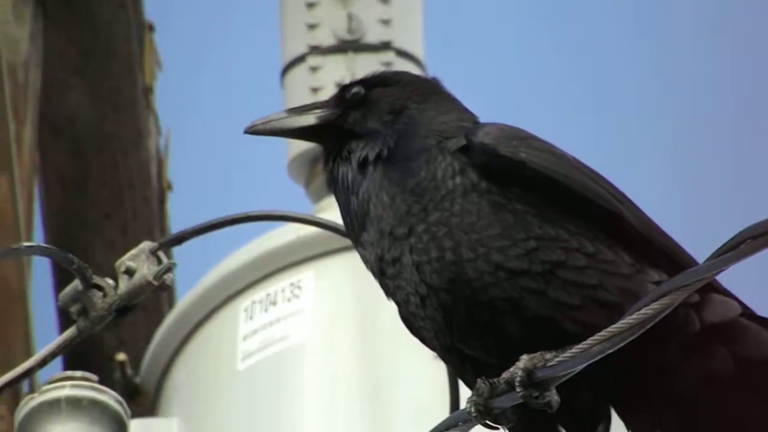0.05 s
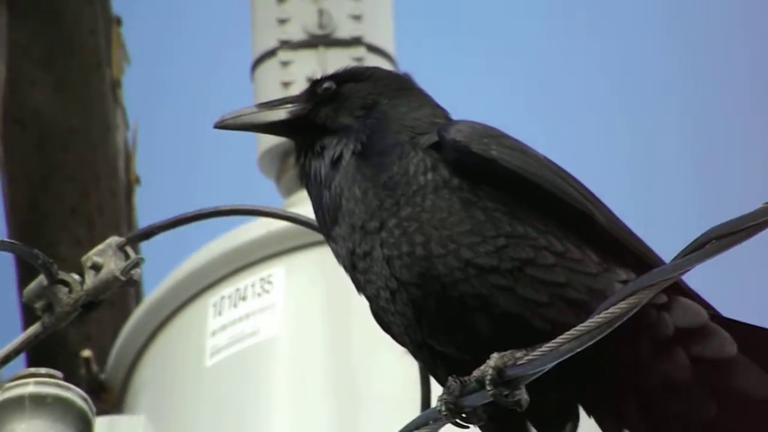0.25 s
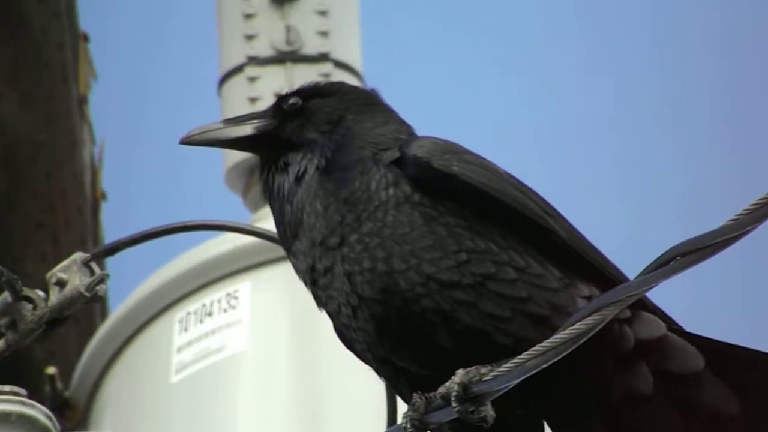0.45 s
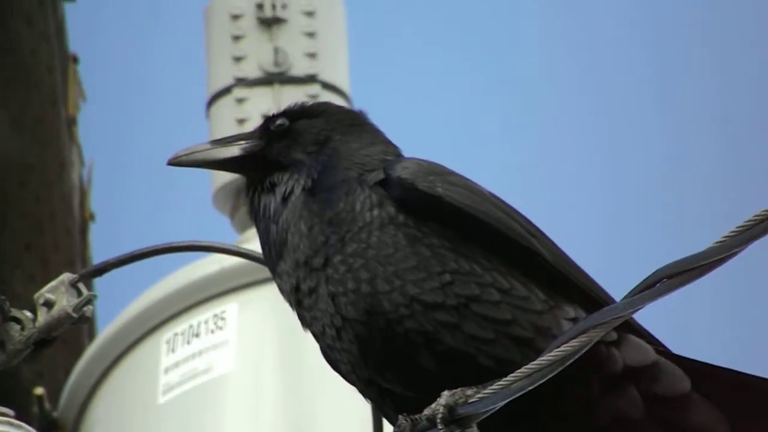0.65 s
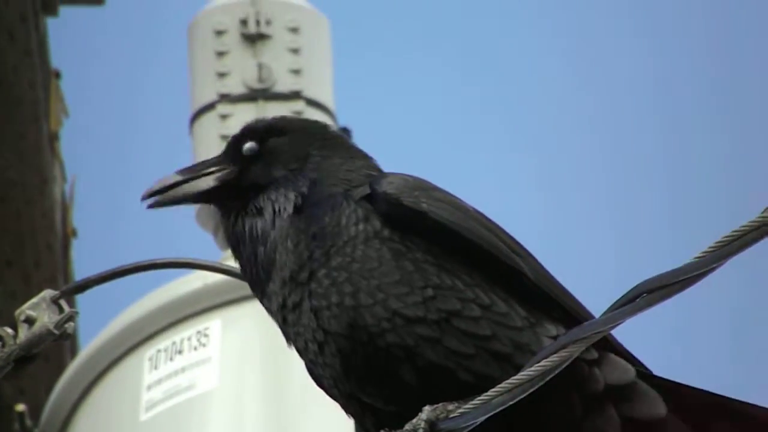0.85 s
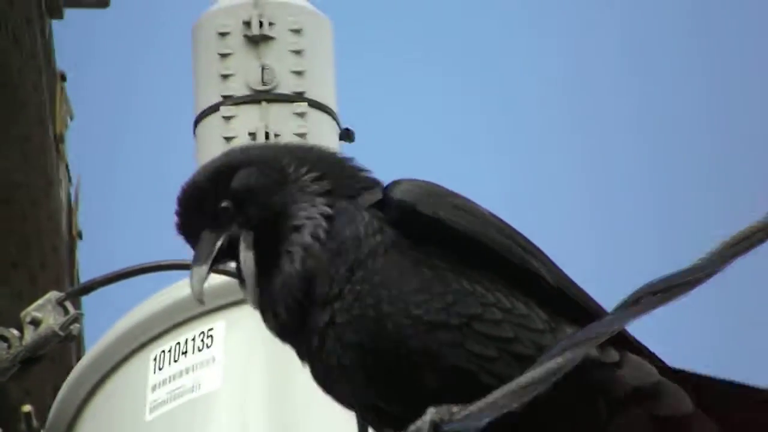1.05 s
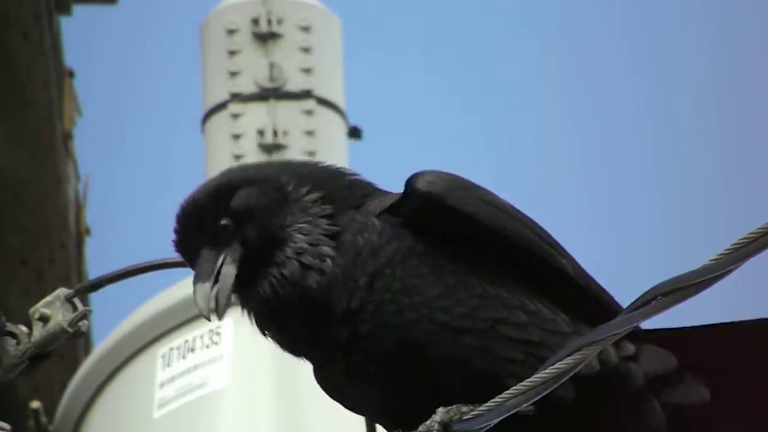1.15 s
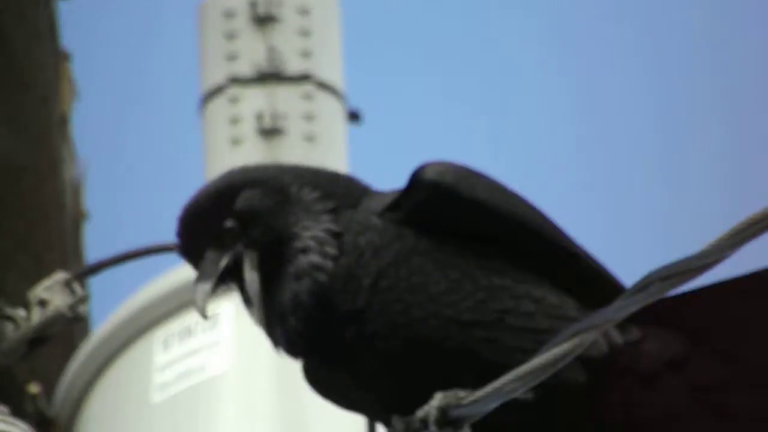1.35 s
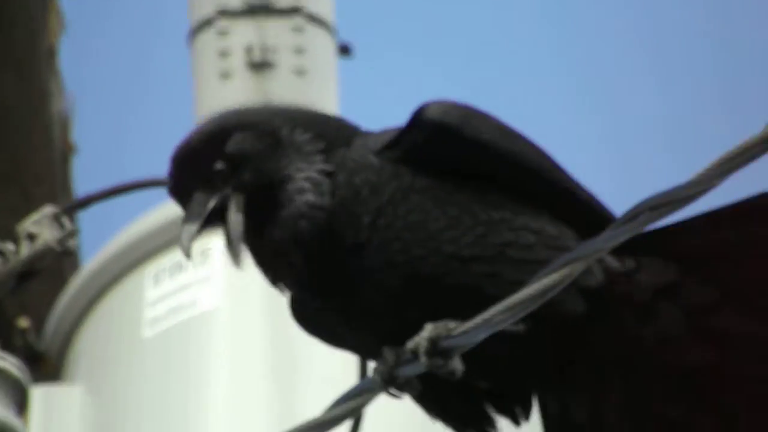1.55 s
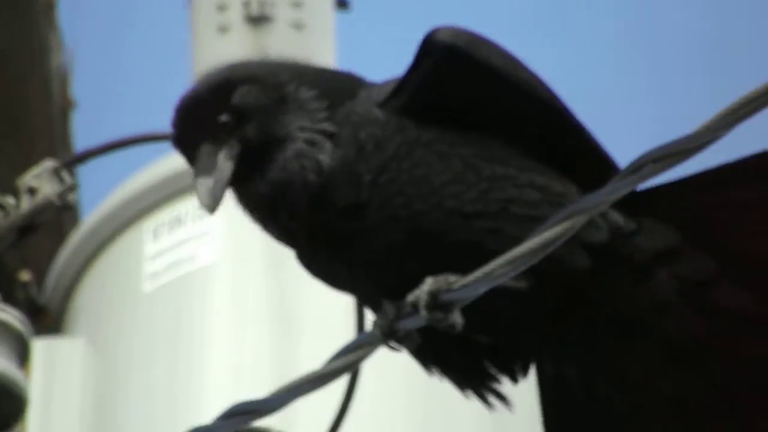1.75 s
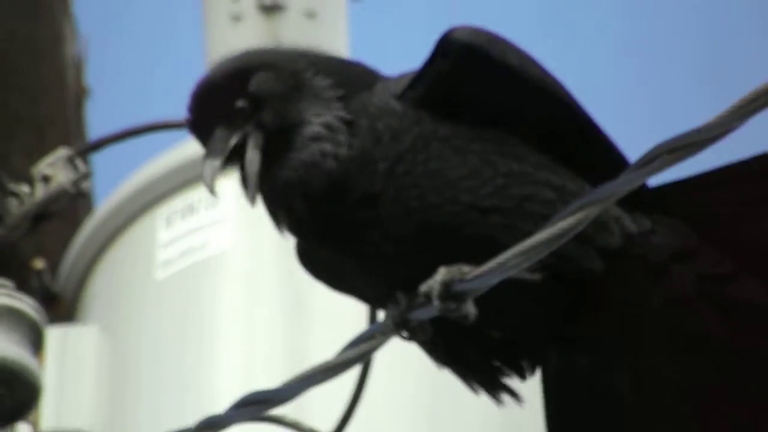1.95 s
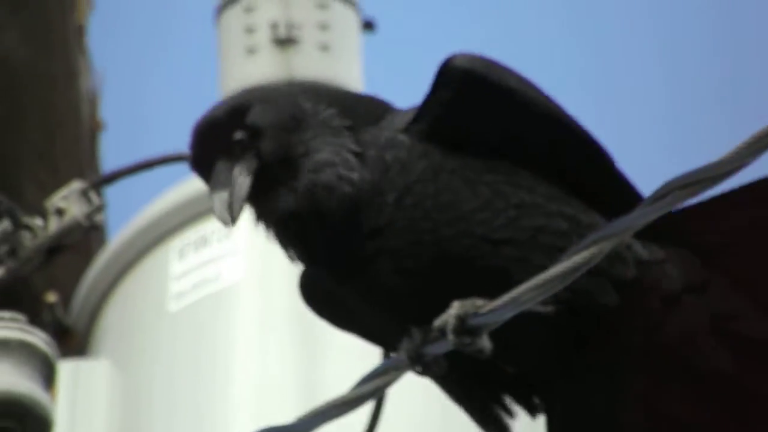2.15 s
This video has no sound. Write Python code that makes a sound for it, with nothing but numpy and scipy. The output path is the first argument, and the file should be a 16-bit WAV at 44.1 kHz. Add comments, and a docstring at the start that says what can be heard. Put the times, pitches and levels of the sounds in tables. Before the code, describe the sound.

A raven makes six hollow, evenly spaced knocking calls and a softer, lower clunk, with a slight outdoor echo. Before the calls, a brief gust flutters and pops on the microphone. A steady hiss lies underneath.

```python
"""A gust flutters and pops on the microphone, over outdoor hiss, a low hum and a faint camera whine.
As it dies down, a raven on a wire beside a pole transformer gives six hollow, evenly spaced knocks
and a softer, lower clunk. Each knock is a few cycles of throat resonance that ring on in the open bill;
the pole and nearby walls throw it back. A thin far whistle slowly swells behind it all."""
import sys
import numpy as np
from scipy import signal
from scipy.fft import rfft, irfft, next_fast_len
from scipy.io import wavfile
from scipy.ndimage import map_coordinates

SR = 44100
rng = np.random.default_rng(int(sys.argv[2]) if len(sys.argv) > 2 else 0)


def waveform_to_disk(signal):
    """Save audio, clipped to [-1, 1], as 16-bit WAV at the path in sys.argv[1]."""
    frames = np.transpose(np.atleast_2d(signal))
    scaled = np.clip(frames, -1, 1) * 32767
    samples = np.round(scaled).astype(np.int16)
    wavfile.write(sys.argv[1], SR, samples)


N = 97020  # 2.2 s


def amp(db):
    """Decibels to gain."""
    return 10 ** (np.asarray(db) / 20)


def clock():
    """Sample times in seconds."""
    return np.arange(N) / SR


def log_interp(points, hz):
    """Interpolate (frequency, value) points on a log frequency axis."""
    point_hz, values = np.transpose(points)
    return np.interp(np.log(hz + 1), np.log(point_hz + 1), values)


def filtered(x, response):
    """Apply a frequency response by zero-padded FFT."""
    size = next_fast_len(N + SR // 2)
    hz = np.fft.rfftfreq(size, 1 / SR)
    return irfft(rfft(x, size) * response(hz), size)[..., :N]


def noise(spectrum, flutter=1):
    """Coloured noise of rms 1; flutter modulates it ahead of the filter."""
    coloured = filtered(flutter * rng.standard_normal(N), lambda hz: amp(log_interp(spectrum, hz)))
    return coloured / np.sqrt(np.mean(coloured ** 2) + 1e-20)


# (frequency [Hz], relative density [dB])
HISS_SPECTRUM = [(20, -19), (32, -6), (50, -22), (100, -9), (200, -7), (380, -6), (560, 0.5), (900, 0),
                 (1400, -3), (1800, -4.5), (2350, -3), (2900, -8), (5900, -11.5), (8000, -10.5),
                 (9600, -15), (11000, -22), (14000, -25.5), (15500, -31)]
# (frequency [Hz], left-right correlation [ratio])
HISS_CORRELATION = [(900, 1), (2200, .998), (5000, 0.96), (9000, 0.94), (13000, 0.87)]


def outdoor_hiss(mid_rms_db=-54):
    """Steady hiss, wider in the treble."""
    def mid_side_response(hz):
        side_gain = np.tan(np.arccos(log_interp(HISS_CORRELATION, hz)) / 2)
        return amp(log_interp(HISS_SPECTRUM, hz)) * [np.ones_like(hz), side_gain]

    mid, side = filtered(rng.standard_normal((2, N)), mid_side_response)
    return amp(mid_rms_db) * np.array([mid + side, mid - side]) / mid.std()


# (frequency [Hz], rms level [dB])
HUM_TONES = [(64.6, -68.5), (129.5, -77)]
# (frequency [Hz], rms level [dB])
CAMERA_WHINE_TONES = [(9777, -73.5), (11714, -81)]


def hum_and_whine():
    """A low hum and the camera's thin whine: steady sines at random phases."""
    return sum(amp(db) * np.sqrt(2) * np.sin(2 * np.pi * (hz * clock() + rng.random()))
               for hz, db in HUM_TONES + CAMERA_WHINE_TONES)


# (start [s], end [s], pitch [Hz], top rms level [dB])
FAR_WHISTLE = (0.2, 4.3, 1432, -66)


def far_whistle():
    """A thin far tone, still swelling when the scene ends."""
    start_s, end_s, hz, db = FAR_WHISTLE
    progress = np.clip((clock() - start_s) / (end_s - start_s), 0, 1)
    swell = np.sqrt(2 * np.sin(np.pi * progress))
    return amp(db) * swell * np.sin(2 * np.pi * hz * clock())


def pressure_swing(cycles, half_width_cycles):
    """One eddy passing the microphone: a sine under a Gaussian envelope."""
    return np.exp(-.5 * (cycles / half_width_cycles) ** 2) * np.sin(2 * np.pi * cycles)


# (time [s], eddy strength [dB])
GUST_STRENGTH = [(0, -77), (.165, -72), (.21, -47), (.25, -54), (.32, -60), (.37, -50), (.41, -56),
                 (.47, -40), (.51, -32.5), (.542, -44.5), (.585, -37.5), (.64, -43), (.70, -52),
                 (.74, -40.5), (.83, -45), (.88, -50.5), (.95, -70), (1.05, -61.5), (1.10, -70),
                 (1.38, -72)]


def eddies(count=300, boost_db=4, scatter_db=3, crest_hz=638, oct_per_db=.05, scatter_oct=.2):
    """A stream of small random pops, louder and higher when the gust is strong."""
    knot_s, knot_db = np.transpose(GUST_STRENGTH)
    jitter, detune, polarity, spread = rng.standard_normal((count, 4)).T
    centre_s = knot_s[-1] * (np.arange(count) + .5 * jitter) / count
    gust_db = np.interp(centre_s, knot_s, knot_db)
    hz = crest_hz * 2 ** (oct_per_db * (gust_db - knot_db.max()) + scatter_oct * detune)
    gain = np.sign(polarity) * amp(gust_db + boost_db + scatter_db * np.clip(spread, -2, 2))
    offsets = np.arange(-SR // 100, SR // 100)
    swings = gain[:, None] * pressure_swing(hz[:, None] * offsets / SR, half_width_cycles=.42)
    samples = np.abs((centre_s * SR).astype(int)[:, None] + offsets)
    return np.bincount(samples.ravel(), swings.ravel(), N)[:N]  # overlap-add


# (time [s], envelope peak [dB], pitch [Hz], half width [cycles])
GUST_POPS = [(0.2203, -27.5, 510, 0.38), (0.2287, -32, 430, .29), (.273, -24, 493, 0.3),
             (.365, -18, 476, 0.26), (.388, -21.5, 507, 0.37), (0.4297, -28, 400, 0.38),
             (.4541, -27, 450, 0.31), (0.4708, -22, 484, .28), (0.4954, -21.5, 544, 0.27),
             (.5021, -15, 480, 0.18), (.5076, -19, 570, 0.9), (.5185, -23.5, 652, 1.4),
             (.5262, -27, 554, 0.72), (.535, -33, 474, 0.78), (0.5532, -28, 420, 0.43),
             (0.564, -20, 444, 0.41), (0.574, -22.5, 430, 0.24), (0.577, -31, 630, 0.3),
             (0.6068, -23, 400, 0.21), (.631, -31, 420, .5), (.6753, -25, 376, 0.33),
             (.742, -24, 395, 0.91), (0.7498, -21, 400, .25), (0.7899, -22, 440, 0.53),
             (.808, -15.5, 435, 0.25), (0.8173, -25, 530, 0.43), (0.8287, -28, 420, 0.2),
             (.862, -33, 467, 0.39), (.879, -34, 440, 0.38), (0.91, -33.5, 420, 0.3), (.938, -36, 151, .3),
             (1.112, -45.5, 148, 0.43)]


def wind_pops():
    """The strongest eddies hit the microphone as single pops, sharp or round."""
    return sum(amp(db) * pressure_swing(np.clip((clock() - centre_s) * hz, -6, 6), half_width)
               for centre_s, db, hz, half_width in GUST_POPS)


# (frequency [Hz], relative density [dB])
RUMBLE_SPECTRUM = [(25, -35), (60, -14.5), (115, -4), (200, 0), (310, 1.5), (430, -4.5), (600, -17),
                   (850, -31), (1500, -63)]
# (time [s], level [dB])
RUMBLE_ENVELOPE = [(0, -77), (.05, -62), (.10, -71), (.168, -66), (.195, -43.5), (.31, -50.5),
                   (.365, -45.5), (.41, -47), (.48, -41), (.51, -29), (.555, -42), (.60, -36), (.66, -42),
                   (.71, -42.5), (.75, -38.5), (.82, -41.5), (.89, -45), (.96, -55), (1.01, -53),
                   (1.045, -47.5), (1.08, -58.5), (1.17, -69), (1.24, -61.5), (1.36, -76), (1.5, -93)]


def wind_rumble(flutter_db=3, knots_per_s=70):
    """Low, quickly fluttering noise of wind on the microphone."""
    wobble = map_coordinates(rng.standard_normal(N // 20), [clock() * knots_per_s], mode="wrap")
    flutter = amp(flutter_db * np.clip(wobble, -2, 2))
    envelope = amp(np.interp(clock(), *np.transpose(RUMBLE_ENVELOPE)))
    return envelope * noise(RUMBLE_SPECTRUM, flutter)


# (delay [s], gain [dB])
REFLECTIONS = [(.00765, -11), (.0154, -21), (.0587, -15.5), (.0703, -27), (.1125, -27)]


def street_echoes(x, tail_db=-14.8, t60_s=.72, rise_s=.02):
    """Direct sound, reflections off the pole and walls, and a thin diffuse tail."""
    def response(hz):
        return 1 + sum(amp(db) * np.exp(-2j * np.pi * hz * delay_s) for delay_s, db in REFLECTIONS)

    t = clock()
    tail = rng.standard_normal(N) * amp(-60 * t / t60_s) * np.minimum(t / rise_s, 1)
    diffuse = signal.fftconvolve(x, tail / np.linalg.norm(tail))[:N]
    return filtered(x, response) + amp(tail_db) * diffuse


def bill_ring(start_s, db, hz=1271, decay_s=.0066):
    """The open bill rings on after a knock, swelling and fading."""
    t = np.maximum(clock() - start_s, 0)
    envelope = t / decay_s * np.exp(1 - t / decay_s)
    return amp(db) * envelope * np.sin(2 * np.pi * hz * t)


ATTACK_S, SNAP_DECAY_S, THIRD_HARMONIC_DB = .00329, .0037, -39
# (frequency [Hz], relative density [dB])
SNAP_SPECTRUM = [(900, -15.5), (1300, 5), (1550, 20), (2100, -3.5), (3500, -14), (9000, -5), (14000, -24)]


def knock(start_s, db, hz, fall_s, sag_hz_per_s=0, snap_db=-27):
    """A few cycles of throat resonance, level or sagging in pitch, with a woody snap."""
    t = np.maximum(clock() - start_s, 0)
    swell = np.sin(np.pi / 2 * np.minimum(t / ATTACK_S, 1)) ** 1.37
    fall = np.exp(-(np.maximum(t - ATTACK_S, 0) / fall_s) ** 1.63)
    phase = 2 * np.pi * t * (hz - sag_hz_per_s * t / 2)
    tone = np.sin(phase) + amp(THIRD_HARMONIC_DB) * np.sin(3 * phase)
    snap = (t > 0) * np.exp(-t / SNAP_DECAY_S) * noise(SNAP_SPECTRUM)
    return amp(db) * (swell * fall * tone + amp(snap_db) * snap)


# (time [s], level [dB], start pitch [Hz], fall [s], bill ring [dB], snap [dB re knock])
RAVEN_KNOCKS = [(1.1285, -25, 1208, 0.0032, -53, -20), (1.2977, -23, 1204, 0.0041, -50.5, -30),
                (1.4525, -27, 1253, 0.0015, -40.5, -17), (1.5986, -22.5, 1236, 0.0018, -37, -24),
                (1.7501, -21.5, 1232, 0.0033, -45, -26), (1.8915, -22, 1193, 0.0036, -47.5, -21)]
# (time [s], level [dB], pitch [Hz], fall [s])
BILL_TICKS = [(1.5635, -44, 1000, .002), (2.016, -45.5, 1220, .0015), (2.1565, -43, 1120, .002)]
# (time [s], level [dB], pitch [Hz], fall [s])
CLOSING_CLUNK = (2.1645, -37.5, 655, .0065)


def raven(sag_hz_per_s=22300):
    """Separate signals for six sagging, ringing knocks, three small bill ticks and the clunk."""
    knocks = [knock(start_s, db, hz, fall_s, sag_hz_per_s, snap_db) + bill_ring(start_s + ATTACK_S, ring_db)
              for start_s, db, hz, fall_s, ring_db, snap_db in RAVEN_KNOCKS]
    ticks = [knock(*tick) for tick in BILL_TICKS]
    return knocks + ticks + [knock(*CLOSING_CLUNK)]


def scene():
    """Bird and gust centred over the stereo hiss; each raven sound gets its own tail."""
    bird = sum(street_echoes(sound) for sound in raven())
    gust = wind_rumble() + eddies() + wind_pops()
    return outdoor_hiss() + hum_and_whine() + far_whistle() + gust + bird


def record(dry, band_limit_hz=15650, left_lag_s=2.15e-5):
    """The camera cuts everything above its band limit; left lags right by a hair."""
    delay_s = np.array([[.5], [-.5]]) * left_lag_s
    return filtered(dry, lambda hz: (hz < band_limit_hz) * np.exp(-2j * np.pi * hz * delay_s))


dry = scene()
out = record(dry)
waveform_to_disk(out)
```